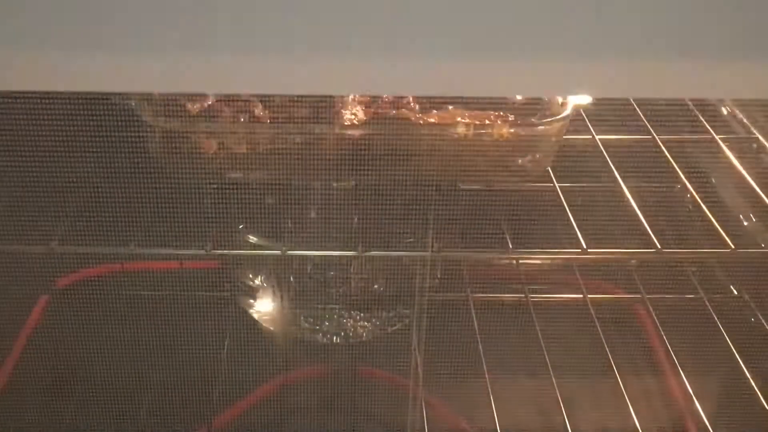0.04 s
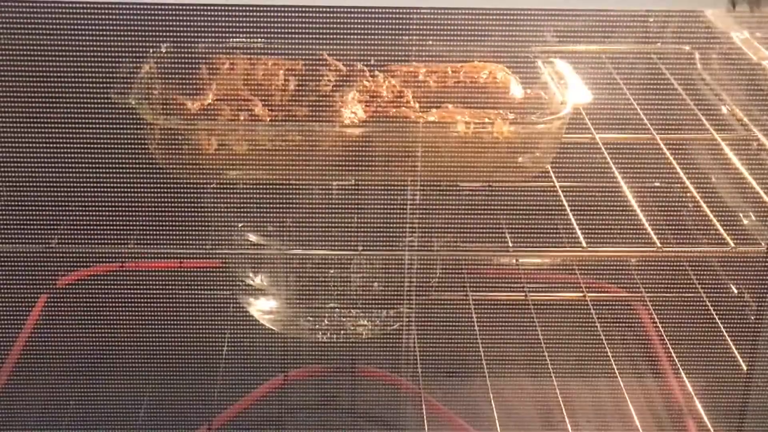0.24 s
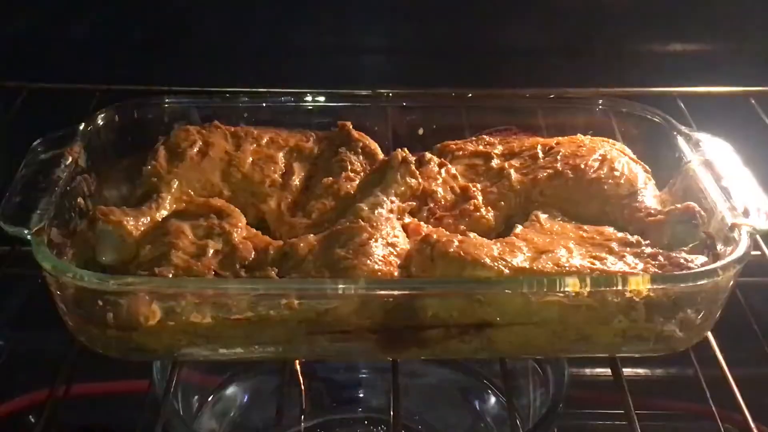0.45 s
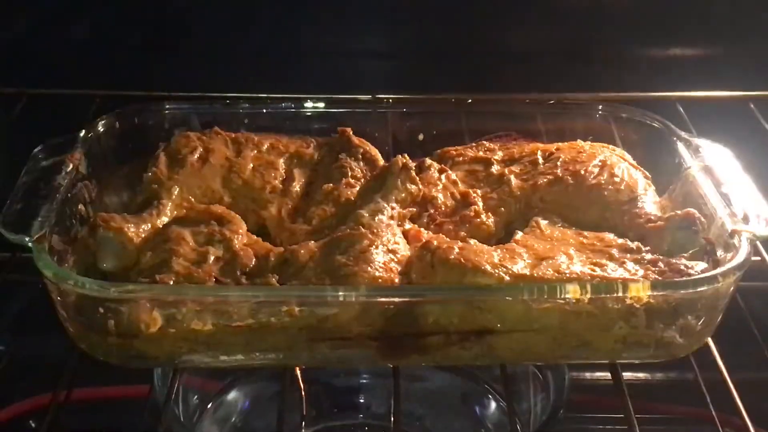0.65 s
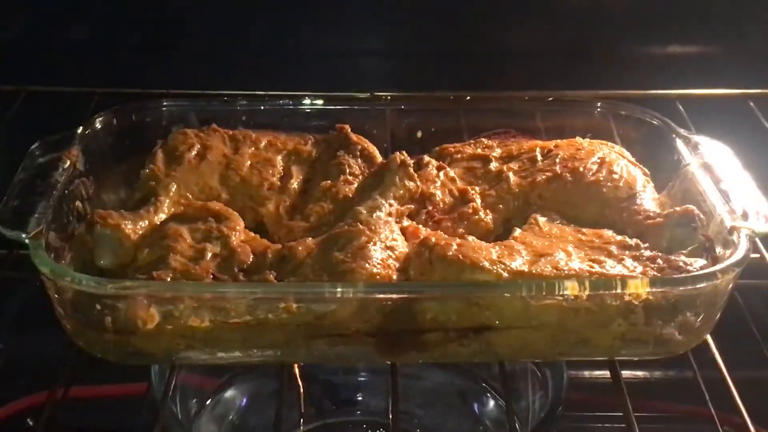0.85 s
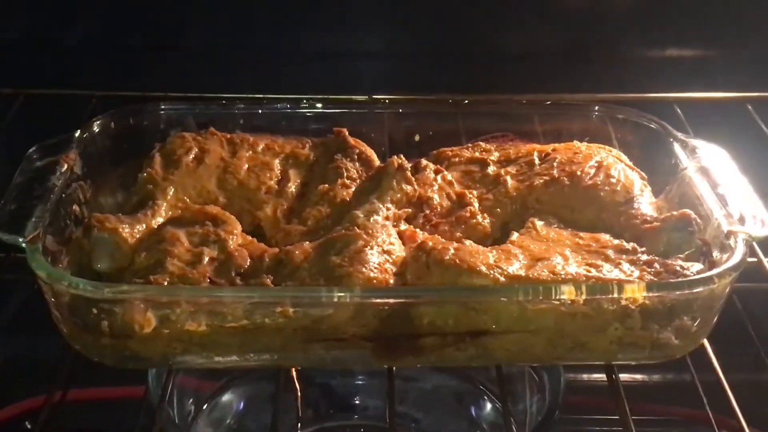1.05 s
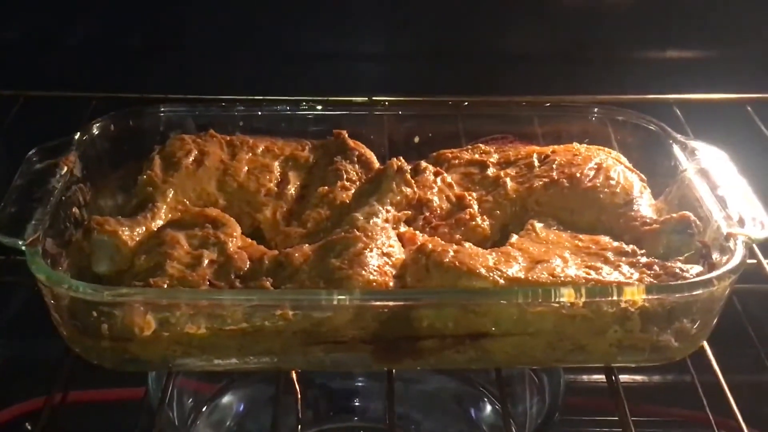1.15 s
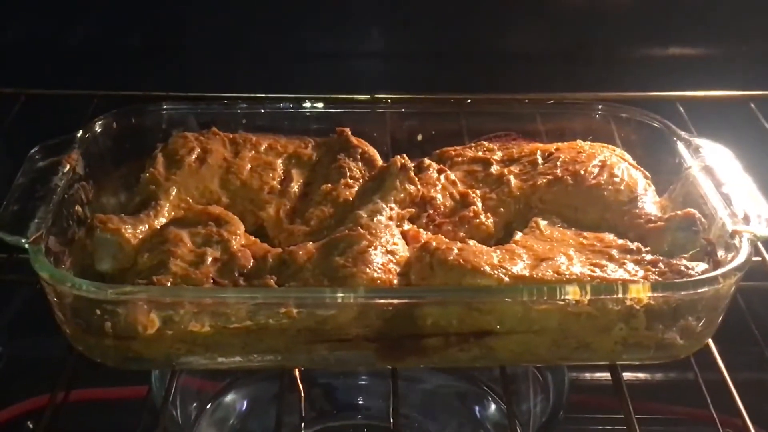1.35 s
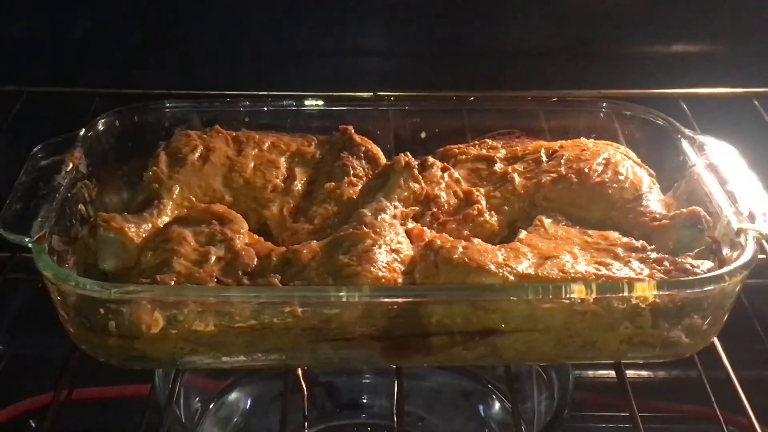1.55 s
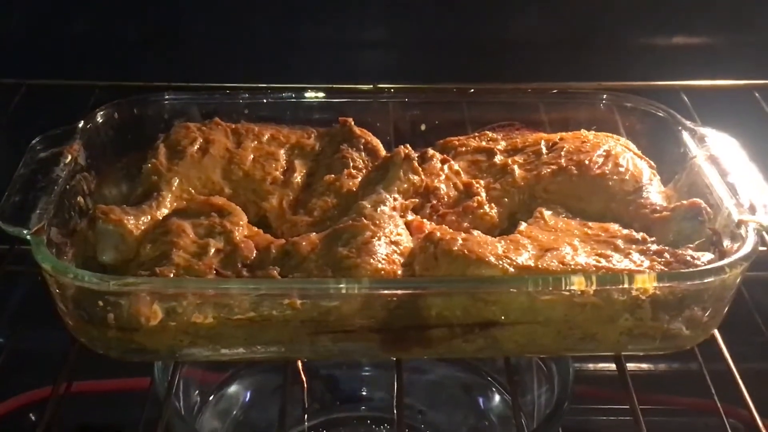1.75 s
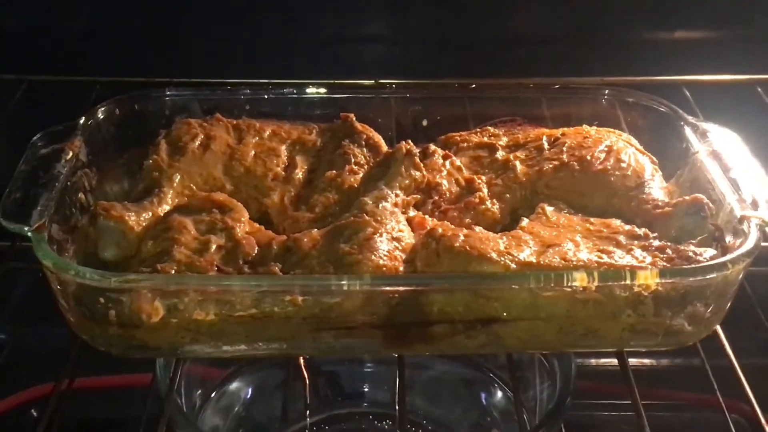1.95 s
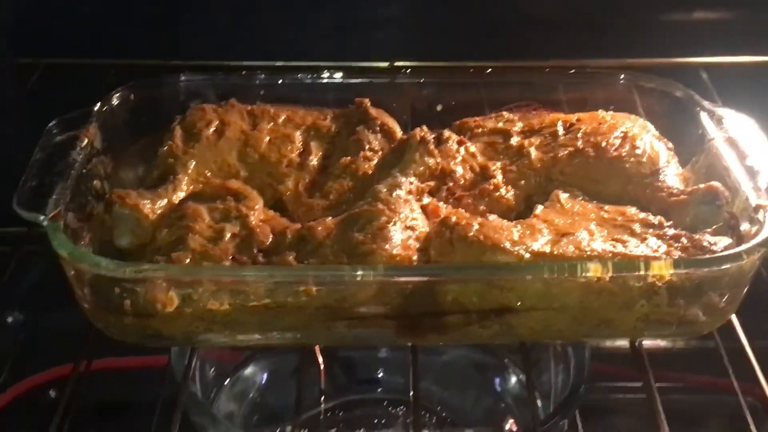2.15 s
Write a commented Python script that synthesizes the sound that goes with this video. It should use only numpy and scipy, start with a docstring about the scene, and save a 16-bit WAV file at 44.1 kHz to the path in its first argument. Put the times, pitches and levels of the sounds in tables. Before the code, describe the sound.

An oven door closes nearby in a kitchen: a few hinge clicks at the start, then a loud thud and metallic snap at about 0.2 to 0.3 seconds, dying away quickly. From 0.5 seconds until the end, just past 2 seconds, cooking food makes faint, irregular pops and ticks, each ringing lightly in the glass dish and oven, over a quiet low hum.

```python
"""Oven door, then cooking

Close to an oven in a kitchen, the door swings up with a few hinge clicks, thuds onto its seal and snaps shut.
After a brief silence the scene changes to the oven heard quietly: a low hum, and small pops from the cooking
food that each ring the same glass dish and steel cavity."""
import sys
import numpy as np
from scipy import signal
from scipy.fft import rfft, irfft
from scipy.io import wavfile

SR = 44100
rng = np.random.default_rng(int(sys.argv[2]) if len(sys.argv) > 2 else 0)


def generate_wav(signal):
    """Clip the signal to [-1, 1] and save it as 16-bit WAV at the path in sys.argv[1]."""
    frames = np.transpose(np.atleast_2d(signal))
    scaled = np.clip(frames, -1, 1) * 32767
    pcm = np.round(scaled).astype(np.int16)
    wavfile.write(sys.argv[1], SR, pcm)


N = 97020
TIME, RING_TIME = np.arange(N) / SR, np.arange(SR // 2) / SR

# The door from close by: hinge clicks, soft landing, hard shut, settling. Each row: start in seconds,
# level in dB, tilt in dB per octave, extra bass in dB, metallic ring and crack in dB, rise in seconds.
DOOR_BLOWS = [(.010, -18, -2, -1.5, -4, 0.03), (.019, -18.5, -0.5, 0.5, -9, 0.0048),
              (.044, -17.5, -3.5, -33, -16, 0.0019), (.116, -13.5, -1.5, -4, -10, 0.011),
              (.130, -23, -6.5, 2, -14, 0.01), (0.1369, -18.5, 2.5, -9, -24, 0.005),
              (0.154, -31, 6, -4, -21, 0.015), (0.215, -12.5, -2.5, 2, -14, 0.013),
              (.223, -2, -5.5, 2, -6, 0.0098), (0.231, 0, -5, 3, -3.5, 0.006),
              (.247, -9.5, 1.5, 11, -6.5, .005), (0.261, -7, -2.5, 1, -24, 0.0029),
              (0.2754, 2, 0, -2, -11.5, 0.0024), (0.29, 3, .5, -1.5, -1.5, 0.00078),
              (.303, -6.5, -2, 9, -23, 0.0016), (.410, -18.5, -7, -10.5, -12.5, 0.0047)]
# Dense ring of the door's panels. Each row: frequency in Hz, level in dB.
PANEL_SPECTRUM = [(25, -18.5), (70, -15), (130, -19), (250, -16), (400, -20.5), (490, -32), (590, -18.5),
                  (680, -28.5), (850, -25.5), (1400, -27), (1950, -30), (2250, -27), (2700, -30.5),
                  (4200, -33.5), (6000, -33.5), (7700, -42.5), (8400, -35), (10500, -42.5), (15500, -42.5)]
# Its decay. Each row: frequency in Hz, seconds to fall 60 dB (T60).
PANEL_T60 = [(60, 0.13), (300, 0.2), (1500, .15), (5000, 0.12), (14000, 0.043)]
# Strong modes of door and oven shell. Each row: frequency in Hz, level in dB, T60 in seconds.
DOOR_MODES = [(183, -37, .27), (234, -35, .2), (256, -38, .2), (283, -40, .18), (341, -42, .22),
              (395, -44, .22), (581, -32, .15), (755, -48, .2), (874, -47, .22), (1016, -47, .22),
              (1191, -49, .2), (1295, -48, .18), (1433, -50, .2), (1711, -49, .18), (2231, -45, .18),
              (2293, -50, .22), (2497, -51, .22), (3327, -48, .18), (3975, -50, .22)]
# Metal meeting metal. Each row: frequency in Hz, level in dB.
CRACK_SPECTRUM = [(200, -70.5), (1500, -21), (4000, -20), (8500, -26), (15500, -30.5)]

def door():
    """Each blow rings the panels with its own brightness, bass and metallic ring."""
    out, modes = np.zeros(N), mode_ring(DOOR_MODES)
    hz = abs(np.fft.fftfreq(8192, 1 / SR))
    octaves = np.log2(np.clip(hz, 810, 8600) / 1030)  # the tilt pivots at 1030 Hz
    bass_shelf = 1 / (1 + (hz / 390) ** 4)
    for start, db, tilt_db, bass_db, metal_db, rise_s in DOOR_BLOWS:
        crack = noise(CRACK_SPECTRUM, len(RING_TIME)) * decay(t60=.02)
        panels = dense_ring(PANEL_SPECTRUM, PANEL_T60)
        blow = (panels + amp(metal_db) * (modes + crack)) * attack(rise_s)
        add(out, start, colour(blow, db + tilt_db * octaves + bass_db * bass_shelf))
    return out

# Food popping in the dish, heard from outside the oven. Each row: start in seconds, level in dB.
POPS = [(.501, -1.5), (.609, -3), (.6745, -4.5), (.7265, -4), (.824, .5), (.999, .5), (1.241, -16),
        (1.4285, -.5), (1.7638, -.2), (1.9815, -.6), (2.1585, -.6)]
# Dense ring of the steel cavity. Each row: frequency in Hz, level in dB.
CAVITY_SPECTRUM = [(300, -70), (900, -63), (1300, -64), (2100, -59), (2400, -62), (3200, -60.5),
                   (4500, -60.5), (5300, -71), (5900, -62), (6300, -67), (9000, -66.5), (10500, -71.5),
                   (15500, -75)]
# Its decay. Each row: frequency in Hz, T60 in seconds.
CAVITY_T60 = [(1000, 0.42), (2500, 0.51), (4500, 0.45), (7000, 0.23), (14000, .14)]
# Modes of the glass dish and rack. Each row: frequency in Hz, level in dB, T60 in seconds.
DISH_MODES = [(812, -73, .45), (2174, -69, .25), (3079, -69, .22), (3262, -72, .2), (3832, -69, .18),
              (4021, -70, .18), (4317, -68, .18), (4414, -69, .18), (4656, -68, .26), (5071, -75, .18),
              (5614, -72, .15), (7046, -76, .16), (7315, -77, .16), (7520, -77, .16), (8823, -77, .13),
              (9119, -76, .13)]
# A tight cluster of high modes that swells and dies quickly. Each row: frequency in Hz, level in dB.
PING_MODES = [(5865, -73), (5937, -71), (6045, -74)]

def pops(own_share=.15, ping_peak_s=.013):
    """All pops come from one spot, so they ring the dish and cavity in nearly the same way."""
    out, t = np.zeros(N), RING_TIME
    shared = np.sqrt(1 - own_share) * dense_ring(CAVITY_SPECTRUM, CAVITY_T60)
    dish = mode_ring(DISH_MODES)
    swell = amp(-1.5) * t / ping_peak_s * np.exp(1 - t / ping_peak_s)
    for start, db in POPS:
        own = np.sqrt(own_share) * dense_ring(CAVITY_SPECTRUM, CAVITY_T60)
        ring = (dish + shared + own) * attack(rise_s=.0055)
        ping = sum(amp(level) * np.sin(2 * np.pi * (hz * t + rng.random())) for hz, level in PING_MODES)
        add(out, start, amp(db) * (ring + swell * ping))
    return out

# Soft low bumps of the oven body. Each row: start in seconds, level in dB, pitch in Hz, T60 in seconds.
BODY_BUMPS = [(0.065, -26, 78, 0.062), (0.167, -37.5, 98.5, 0.08), (.232, -32, 70, 0.12),
              (0.386, -59.5, 39.3, 0.73), (0.759, -73, 52.4, 0.46), (2.123, -49.5, 61, 0.14)]

def body_bumps():
    """The oven body sways for a few cycles."""
    out = np.zeros(N)
    for start, db, hz, t60 in BODY_BUMPS:
        sway = -np.sin(2 * np.pi * hz * RING_TIME)
        add(out, start, amp(db) * attack(rise_s=.013) * decay(t60) * sway)
    return out

# The kitchen's echo at the microphone. Each row: frequency in Hz, level in dB.
ECHO_SPECTRUM = [(60, -45), (300, -44.5), (1000, -49.5), (3000, -45), (7000, -37), (15000, -41)]
# Its decay. Each row: frequency in Hz, T60 in seconds.
ECHO_T60 = [(100, 0.24), (2000, 0.59), (6000, 0.26), (14000, 0.085)]

def in_kitchen(direct):
    """The direct sound arrives first, then the room answers."""
    echo = dense_ring(ECHO_SPECTRUM, ECHO_T60) * attack(rise_s=.0083)
    return direct + signal.fftconvolve(direct, echo)[:N]

# Kitchen air around the microphone. Each row: frequency in Hz, level in dB.
KITCHEN_AIR = [(20, -41), (50, -24), (130, -38), (300, -44.5), (700, -47.5), (1500, -51), (3000, -63.5),
               (6000, -70.5), (15500, -84.5)]
# Its level while the door swings. Each row: time in seconds, gain in dB.
AIR_GAIN = [(0, -2.5), (.025, 3), (.1, 0), (.17, -1.5), (.205, -6), (.26, 7.5), (.48, -2)]

def kitchen_air():
    """Kitchen air, swelling and dipping as the door swings shut."""
    return noise(KITCHEN_AIR, N) * amp(np.interp(TIME, *np.transpose(AIR_GAIN)))

# Hum near the oven. Each row: harmonic number, level in dB while closing, level in dB while cooking.
HUM_HARMONICS = [(1, -74, -83), (2, -53.5, -73), (3, -63.5, -78), (4, -62, -74)]

def mains_hum(cooking, mains_hz=60, waver=.17):
    """Harmonics of the mains, each wavering in level and phase."""
    out = np.zeros(N)
    for harmonic, closing_db, cooking_db in HUM_HARMONICS:
        level = amp(cooking_db if cooking else closing_db) * (1 + waver * drift(4.2))
        out += level * np.sin(2 * np.pi * harmonic * mains_hz * TIME + waver * drift(5.4))
    return out

# Air beside the cooking oven. Each row: frequency in Hz, level in dB.
OVEN_AIR = [(20, -55.5), (35, -55.5), (52, -44), (85, -54), (120, -50), (160, -54.5), (270, -52.5),
            (450, -58.5), (720, -64), (820, -63.5), (950, -66.5), (1800, -69.5), (3200, -76), (6000, -79.5),
            (15500, -85.5)]
# Swell of its rumble. Each row: time in seconds, gain in dB.
RUMBLE_GAIN = [(.5, -1.5), (.7, 4), (.86, 5.5), (1.0, 1.5), (1.2, 1), (1.6, 0.5), (2.2, 1)]

def oven_air(rumble_top_hz=1490):
    """Faint hiss over a rumble that swells slowly and flutters by about 1 dB."""
    air = noise(OVEN_AIR, N)
    rumble = signal.sosfiltfilt(signal.butter(2, rumble_top_hz, fs=SR, output="sos"), air)
    hiss = air - rumble
    swell_db = np.interp(TIME, *np.transpose(RUMBLE_GAIN))
    return hiss + rumble * amp(swell_db + drift(rate_hz=60))

def dense_ring(spectrum, t60s):
    """Countless overlapping modes: noise whose bands each die at their own speed."""
    size = len(RING_TIME)
    hz, centres = np.fft.rfftfreq(size, 1 / SR), np.geomspace(50, 15000, 10)
    bins, out = rfft(noise(spectrum, size)), np.zeros(size)
    for centre, weights in zip(centres, np.eye(len(centres))):
        band = irfft(bins * value_at(np.c_[centres, weights], hz), size)
        out += band * decay(value_at(t60s, centre))
    return out

def mode_ring(modes):
    """Dying sines of alternating sign, one for each mode."""
    return sum((-1) ** k * amp(db) * decay(t60) * np.sin(2 * np.pi * hz * RING_TIME)
               for k, (hz, db, t60) in enumerate(modes))

def noise(spectrum, size):
    """Steady noise with the given spectrum."""
    hz = np.fft.rfftfreq(size, 1 / SR)
    phases = np.exp(2j * np.pi * rng.random(len(hz)))
    return irfft(phases * amp(value_at(spectrum, hz)), size) * np.sqrt(size)

def drift(rate_hz):
    """Random wandering of unit size."""
    lowpass = np.exp(-(np.fft.rfftfreq(N, 1 / SR) / rate_hz) ** 2)
    wander = irfft(rfft(rng.standard_normal(N)) * lowpass, N)
    return wander / wander.std()

def colour(sound, gain_db):
    """Minimum-phase filter from a gain for each FFT bin."""
    response = np.exp(np.conj(signal.hilbert(np.log(amp(gain_db)))))
    taps = np.fft.ifft(response).real[:len(gain_db) // 2]
    return signal.fftconvolve(sound, taps)[:len(sound)]

def attack(rise_s):
    """A straight rise to full level."""
    return np.minimum(RING_TIME / rise_s, 1)

def decay(t60):
    """A fall of 60 dB every t60 seconds."""
    return 1e-3 ** (RING_TIME / t60)

def amp(db):
    """Decibels to gain."""
    return 10 ** (np.asarray(db) / 20)

def value_at(table, hz):
    """Reads a table on a log-frequency axis."""
    frequencies, values = np.transpose(table)
    return np.interp(np.log(hz + 1), np.log(frequencies + 1), values)

def add(mix, start_s, sound):
    """Mixes a sound in at a time."""
    part = mix[round(start_s * SR):][:len(sound)]
    part += sound[:len(part)]

def scene(fade_at_s=.475, resume_at_s=.507):
    """The door closing, then after a brief silence the scene changes to the food cooking, in mono."""
    fade_out = np.clip(1 - (TIME - fade_at_s) / .015, 0, 1) ** 2
    closing_gate = np.clip(TIME / .0051, 0, 1) * fade_out
    cooking_gate = np.clip((TIME - resume_at_s) / .001, 0, 1)
    body = body_bumps()
    closing = in_kitchen(door()) + body + kitchen_air() + mains_hum(cooking=False)
    cooking = pops() + body + oven_air() + mains_hum(cooking=True)
    return (closing_gate * closing + cooking_gate * cooking)[None]

def record(dry):
    """The recorder passes sound up to about 15.8 kHz."""
    lowpass = signal.firwin(511, 15780, window=("kaiser", 9), fs=SR)
    return signal.oaconvolve(dry, lowpass[None], "same")

dry = scene()
out = record(dry)
generate_wav(out)
```